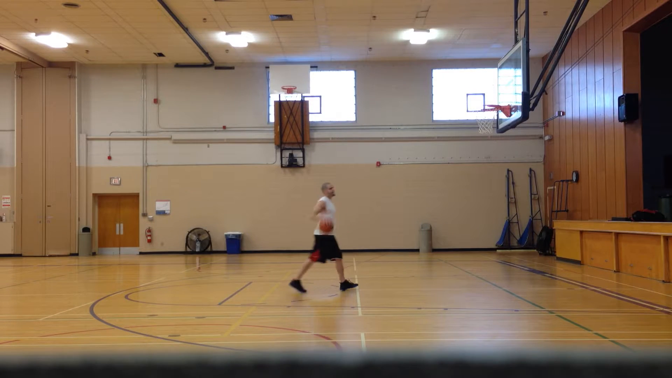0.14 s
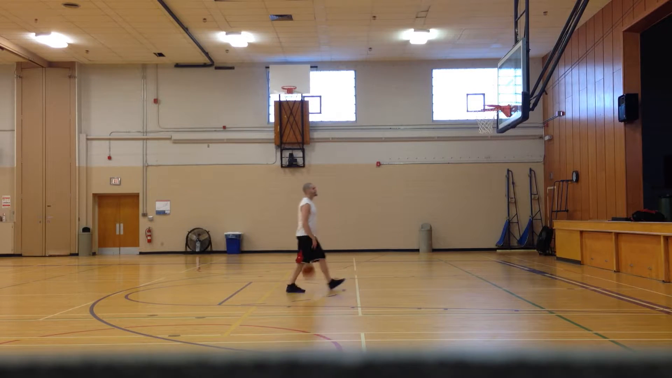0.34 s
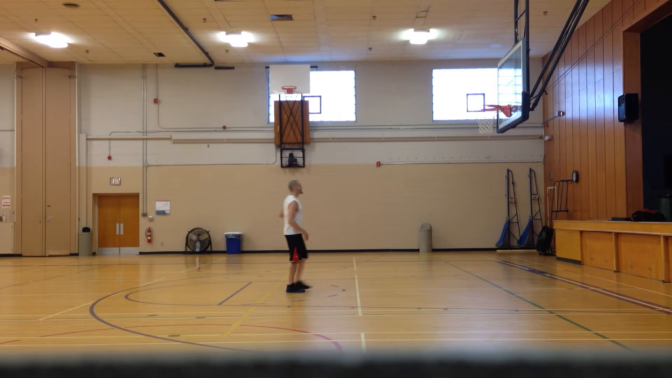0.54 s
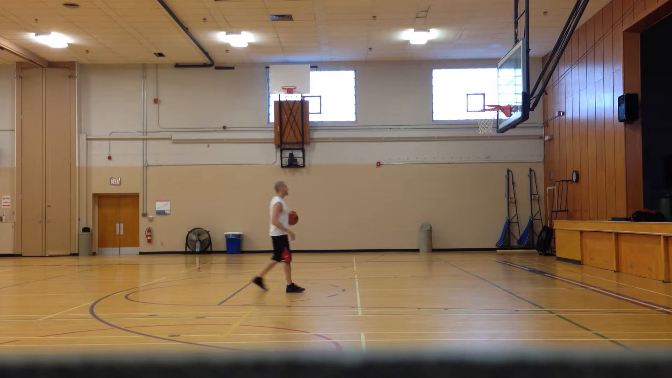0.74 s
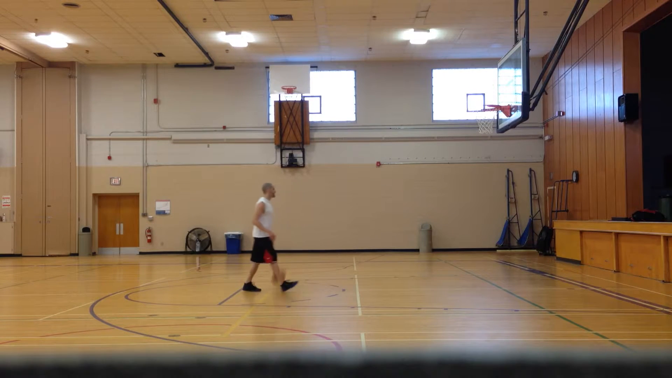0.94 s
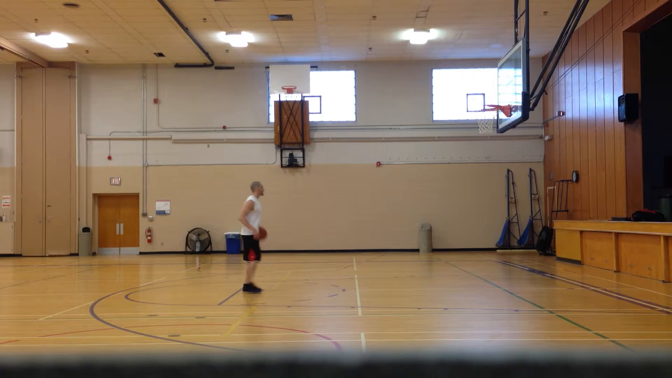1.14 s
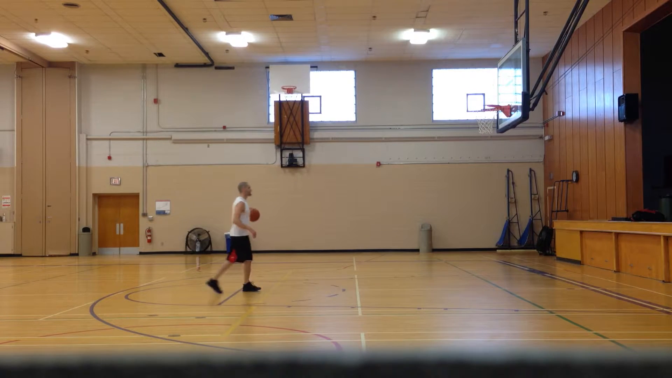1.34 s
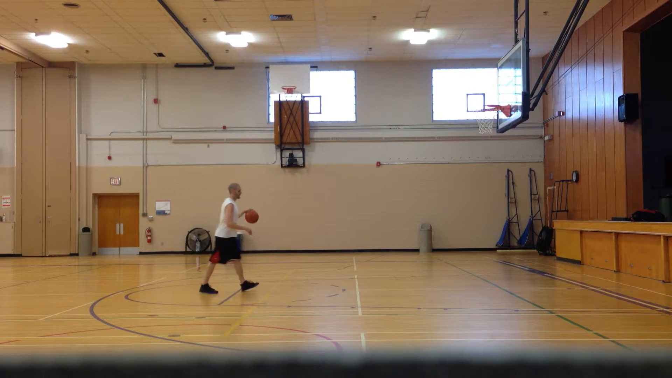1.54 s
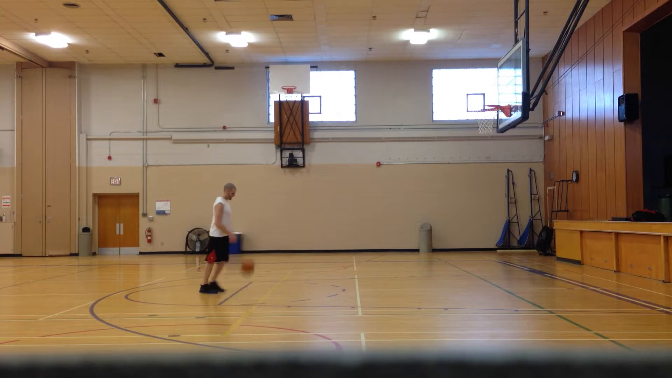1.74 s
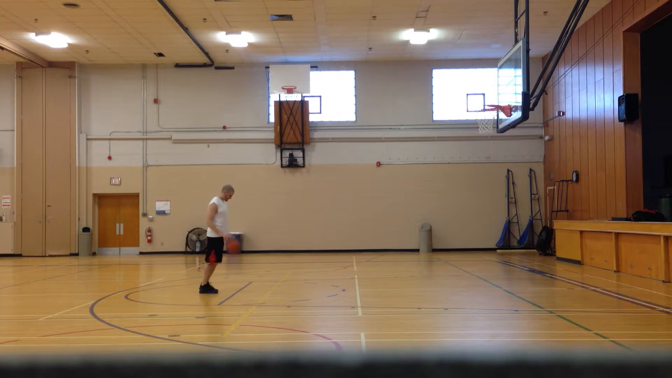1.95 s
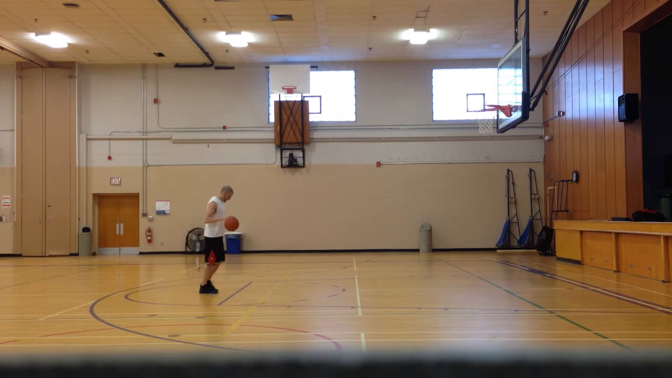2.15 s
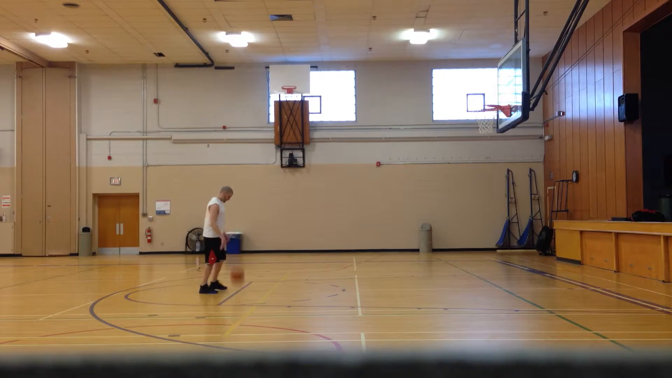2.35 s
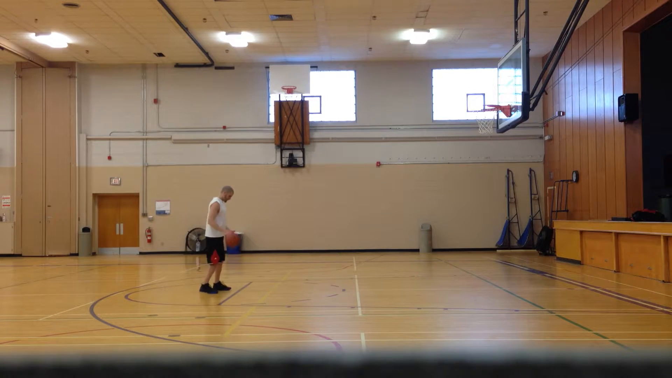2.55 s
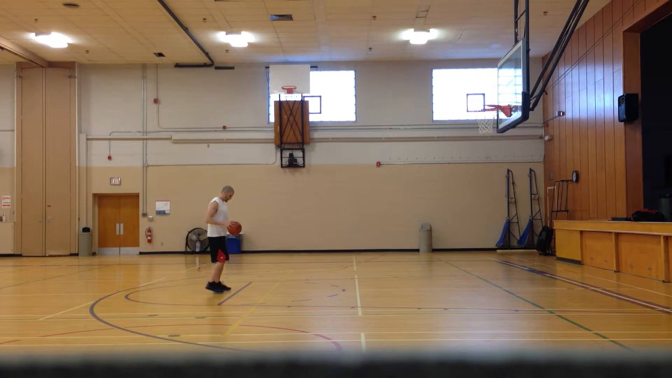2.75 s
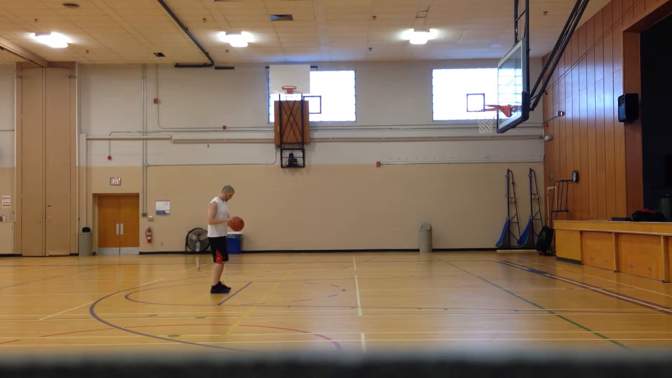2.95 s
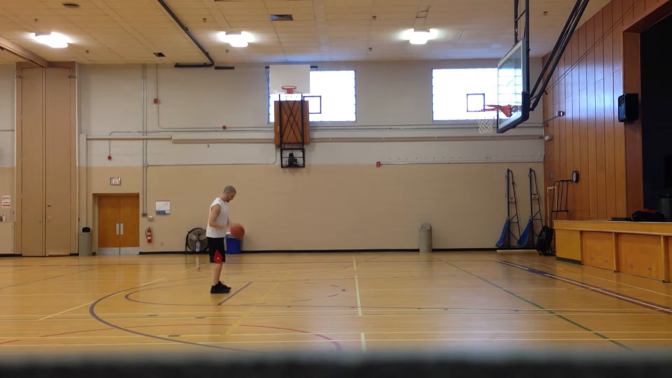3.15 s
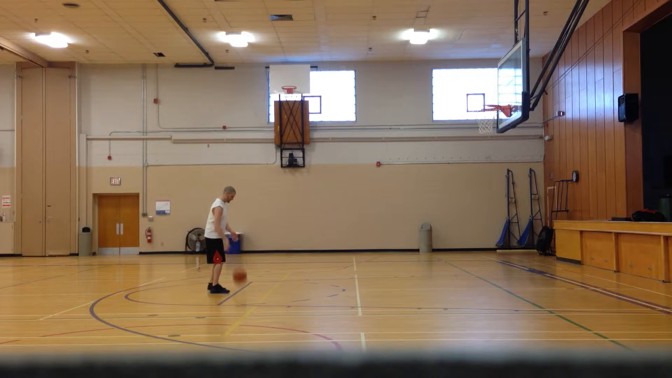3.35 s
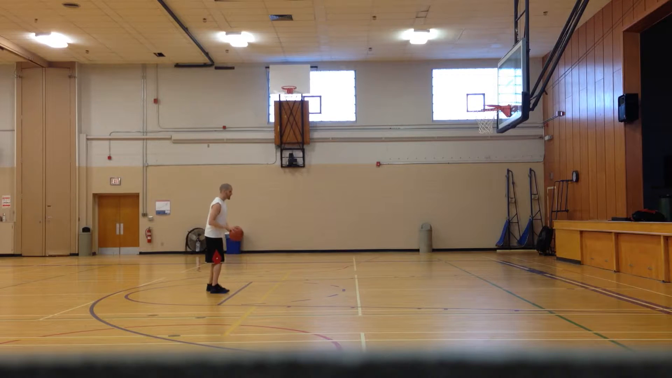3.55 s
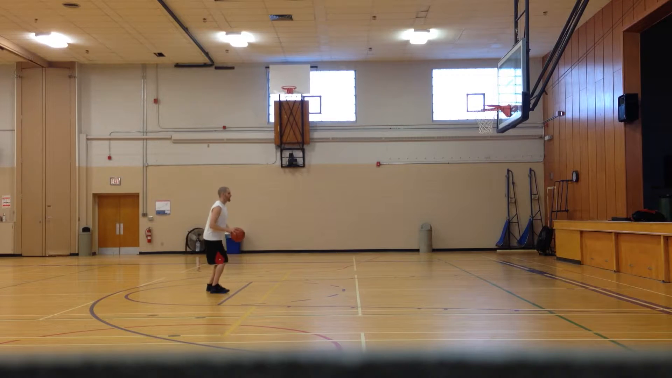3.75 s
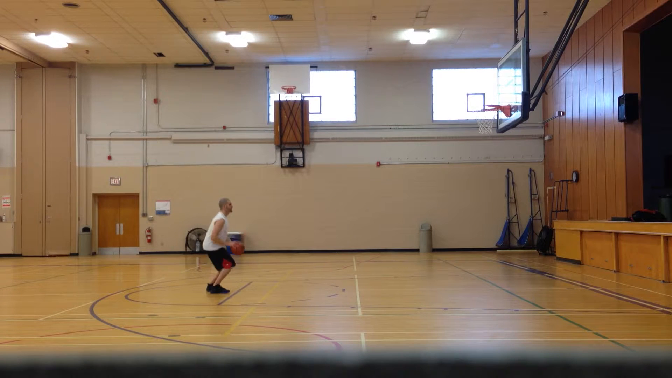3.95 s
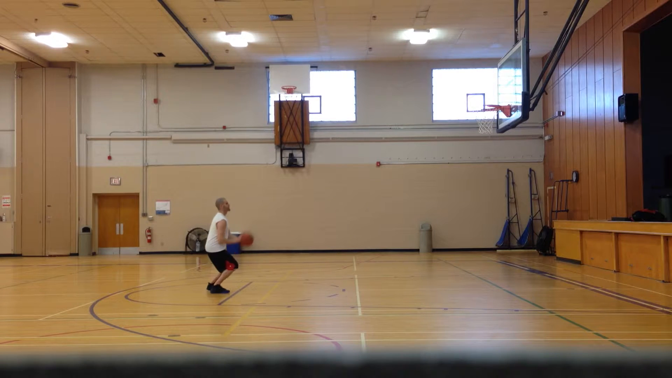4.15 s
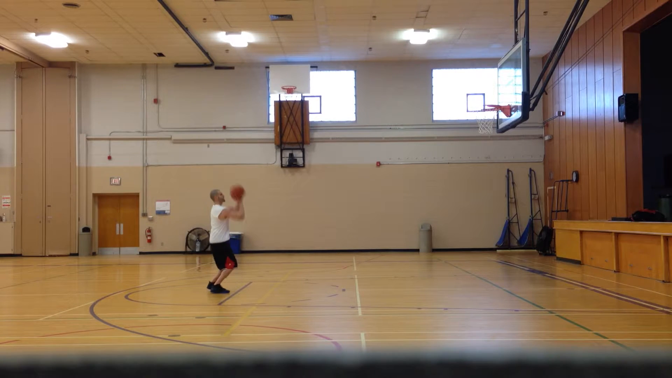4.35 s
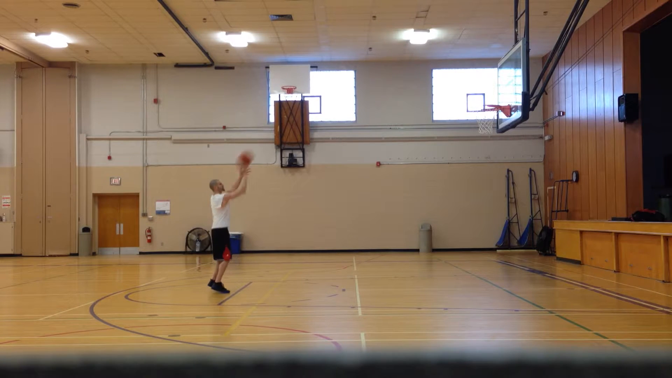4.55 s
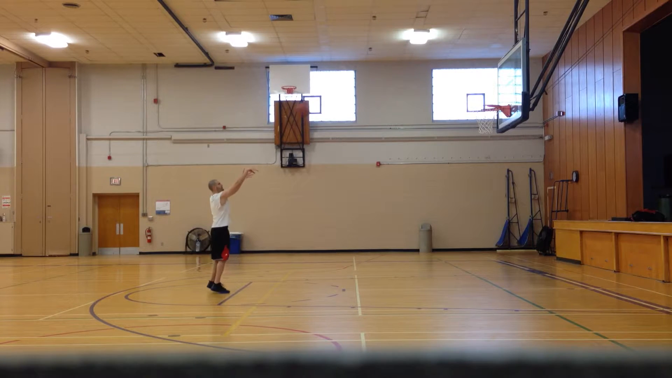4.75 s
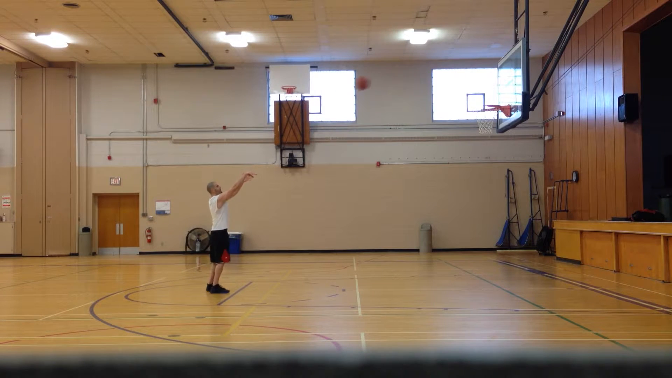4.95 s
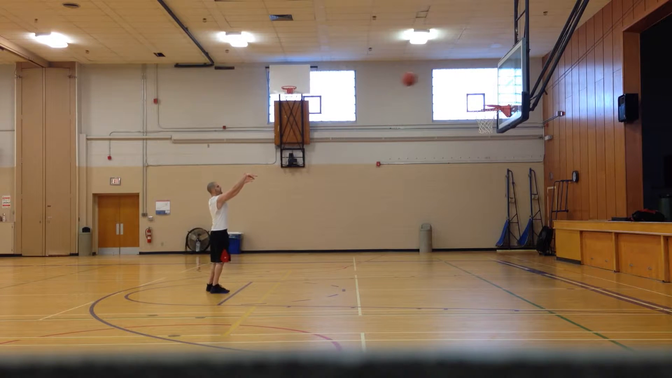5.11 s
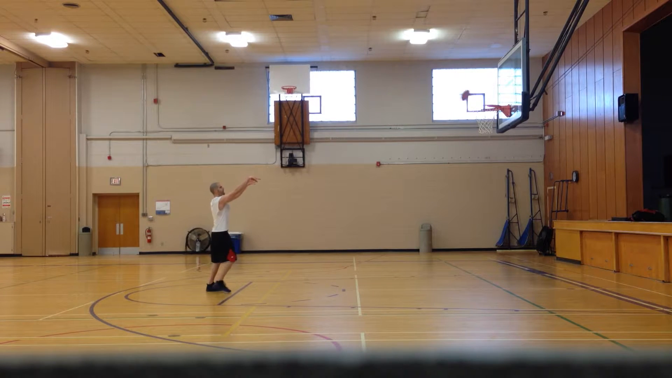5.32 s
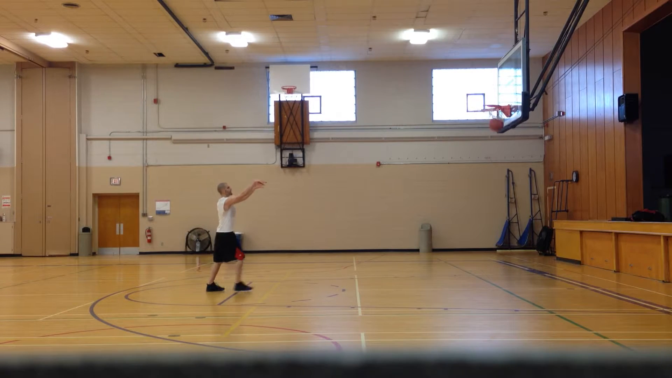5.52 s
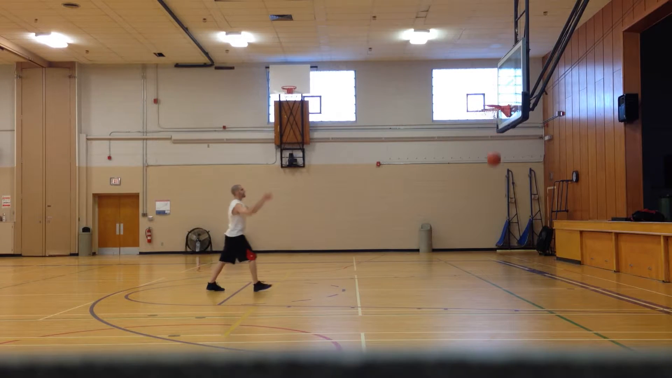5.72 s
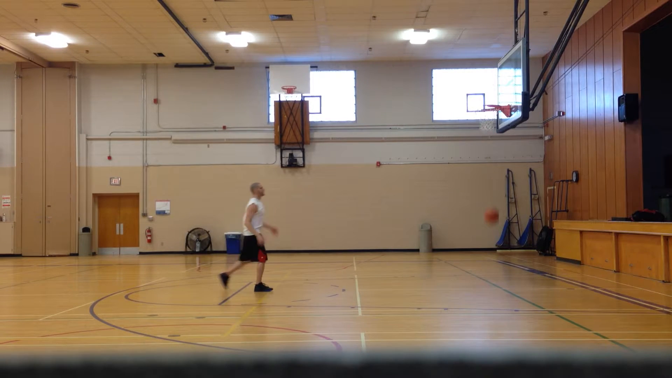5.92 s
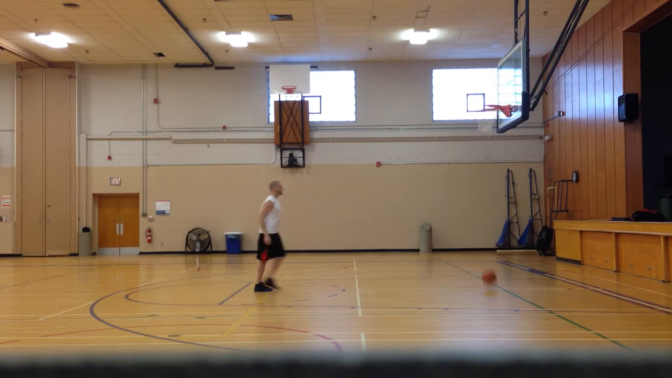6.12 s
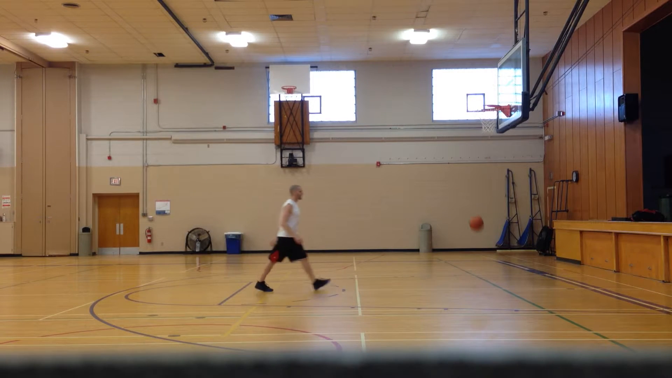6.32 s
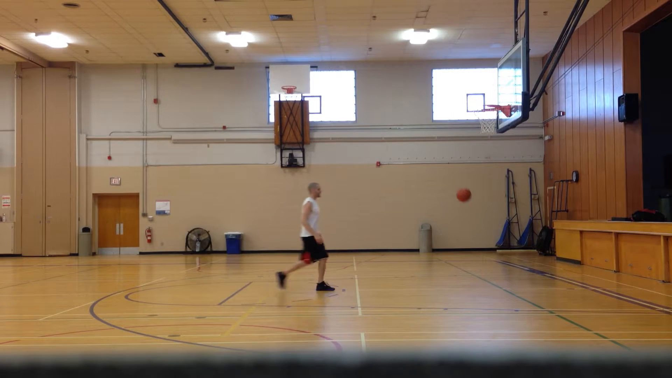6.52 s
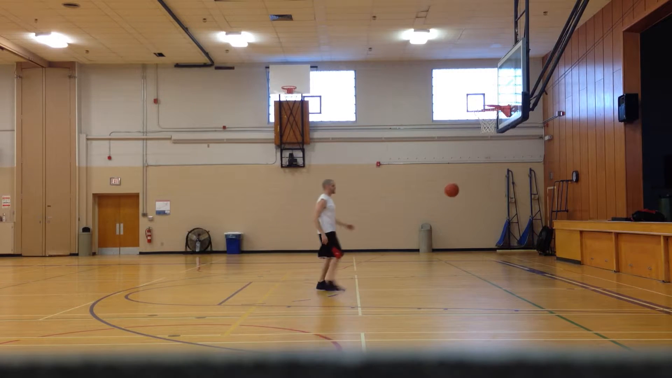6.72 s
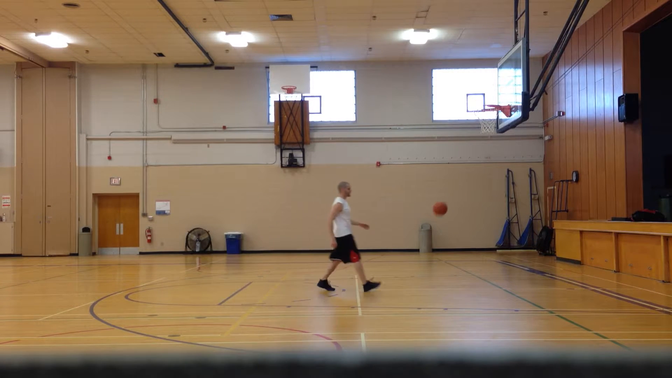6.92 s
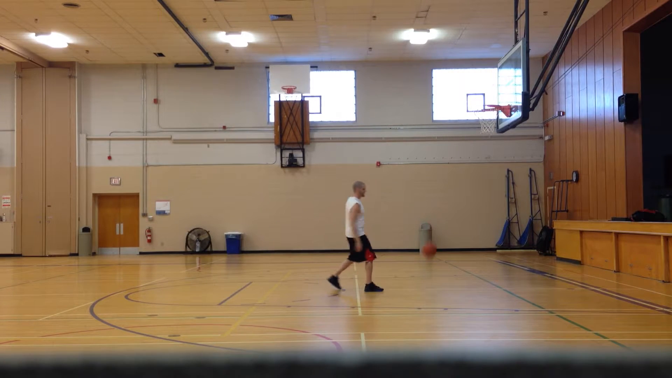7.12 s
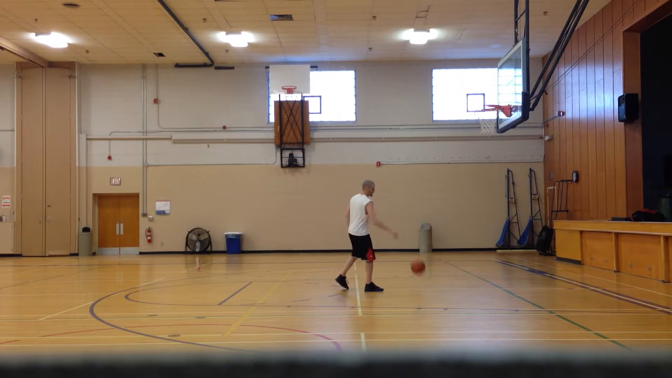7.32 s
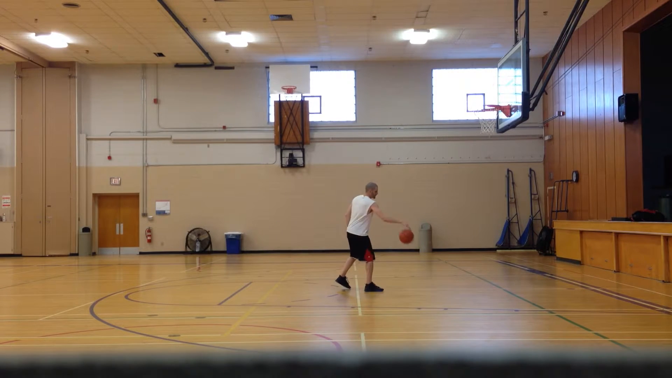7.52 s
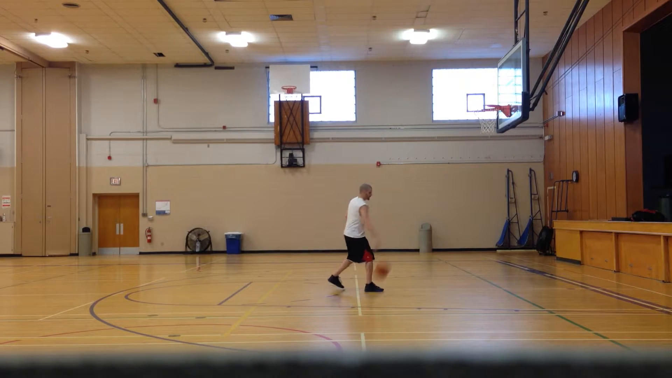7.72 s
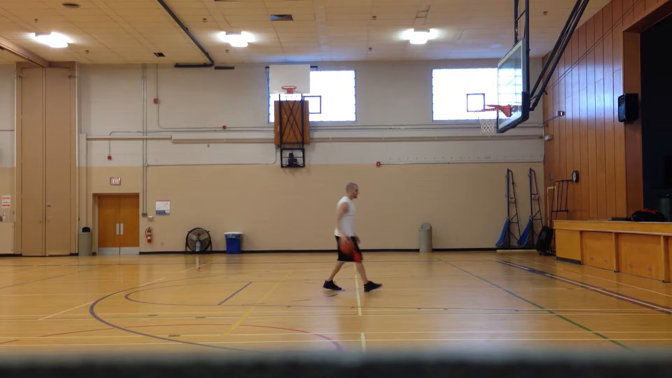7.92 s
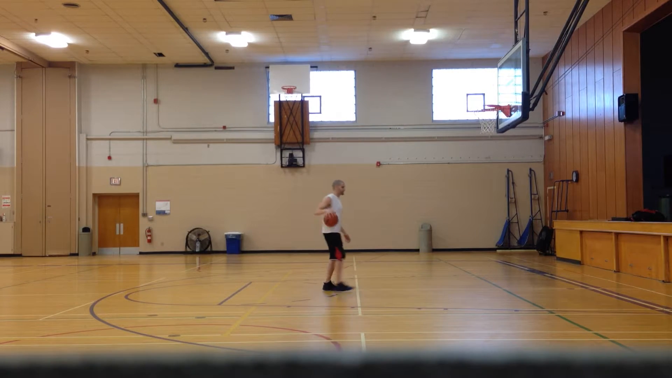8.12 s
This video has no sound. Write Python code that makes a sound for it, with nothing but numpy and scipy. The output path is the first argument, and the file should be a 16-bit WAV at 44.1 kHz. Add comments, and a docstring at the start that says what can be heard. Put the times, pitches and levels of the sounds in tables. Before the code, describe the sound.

In a large gym with a steady ventilation hum, a basketball bounces five times on a springy wooden floor at an easy pace. Each bounce slaps, pings and thumps, with clear echoes and a long tail. After a pause the ball rattles the rim and whips through the net, lands with a louder bounce and bounces twice more. The microphone picks up plenty of the hall.

```python
"""First you hear a bounce dying away in a large gym, over the steady hum of the ventilation.
A basketball is dribbled on the springy wooden floor, shot into the hoop, and dribbled again.
Each bounce is a slap of the skin, a ping of the air in the ball and a thump of the boards;
walls and ceiling throw it back as clear echoes and a long tail.
The shot grazes the hoop, then shakes the rim and whips through the net."""
import sys
import numpy as np
from scipy import signal
from scipy.fft import rfft, irfft, next_fast_len
from scipy.io import wavfile

SR = 44100
rng = np.random.default_rng(int(sys.argv[2]) if len(sys.argv) > 2 else 0)


def to_wav(sig):
    """Store sig (one row per channel, or 1-D mono) as 16-bit WAV at the path in sys.argv[1].

    Samples outside -1..1 are clipped; the rate is SR.
    """
    pcm = np.clip(np.atleast_2d(sig), -1, 1) * 32767
    pcm = np.round(pcm).astype(np.int16)
    wavfile.write(sys.argv[1], SR, pcm.T)  # frames by channels


N = 360297

# Levels in the tables are relative: 0 dB leaves a sound as it is, -6 dB halves its height.
# Each bounce, whose slap is a double click:
# start_s, slap_db, brightness_db_per_octave, click_gap_ms, second_click_share, thump_db, from_stage_m
BOUNCES = [(-.36, -6, 1.7, 0.043, 0.14, -2, 4.5), (0.4342, 0, 0, 0.052, 0.41, -1, 4.6),
           (1.0985, -1.5, -0.22, 0.3, 0.072, -0.5, 7.5), (1.9316, -0.5, -0.3, 0.7, 0.16, -.5, 11),
           (2.5107, -2, 0.52, .7, 0.13, 0.5, 7.3), (3.447, 0.5, -0.2, 0.13, 0.33, -0.5, 6),
           (6.23, 2, -0.5, 0.18, 0.45, 0.5, 1.45), (7.3737, -3, -0.65, 0.088, 0.3, -3, 4.4),
           (7.897, -5, 1, 0.51, 0.25, 0.5, 4.7)]
# The ball's skin slapping the floor: pitch_hz, level_db
SLAP_SPECTRUM = [(60, 24), (300, 13), (700, 1.5), (1300, 12.5), (2200, 8), (4000, 3.5), (5500, -4.5),
                 (10000, -13.5), (15500, -28)]
# Tones of the air inside the ball: pitch_hz, level_db
BALL_TONES = [(600, -52.5), (895, -38.5), (1085, -35.5), (1205, -88), (1420, -40), (1580, -36.5),
              (1770, -68), (2130, -38.5), (2300, -48), (2590, -44), (2860, -37), (3230, -36.5), (3640, -67),
              (4130, -49)]
# Tones of the floorboards (a fade is the time to drop 60 dB): pitch_hz, level_db, fade_s
BOARD_TONES = [(88.8, -34, 0.44), (134, -14, 0.044), (166.5, -27, 0.065), (272.7, -33.5, 0.058),
               (354.3, -32.5, 0.07), (515, -44.5, 0.14)]
# Echoes off nearby surfaces, each a clean copy and a scattered blur: delay_s, copy_db, blur_db, blur_s
FLOOR_ECHOES = [(.0032, -12.5, 8, 0.0032), (.0142, -8.5, 11, 0.005), (.0295, -29, 6.5, .0099),
                (.046, -35, 2.5, 0.0063)]
# The hall's long tail of sound: pitch_hz, level_db
TAIL_SPECTRUM = [(25, -26.5), (50, -23), (85, -27.5), (135, -42), (250, -30.5), (450, -35), (750, -31),
                 (1200, -37), (2200, -36.5), (4000, -38), (5500, -43.5), (8000, -45.5), (15000, -38.5)]
# How long that tail lasts: pitch_hz, fade_s
TAIL_FADES = [(50, 3.15), (90, 2.18), (170, 1.53), (350, 1.75), (700, 1.78), (1200, 2.415), (2400, 2.4),
              (4000, 1.97), (6000, 1.65), (9000, 0.87), (15000, 0.18)]
# Rushing air of the ventilation: pitch_hz, level_db
AIR_SPECTRUM = [(13, -49), (22, -10), (54, -16), (70, -5), (92, -1), (138, -14), (182, -25.5), (209, -20.5),
                (382, -28.5), (414, -26.5), (779, -38), (2600, -45), (2830, -45), (9460, -48.5),
                (15500, -49)]
# Fan and duct tones: pitch_hz, level_db, width_hz
FAN_TONES = [(84.3, -55.5, 17), (110.7, -57, 28), (187.5, -66, 5.3), (382, -77.5, 2.1)]
# The ball touching the hoop: start_s, level_db, width_octaves
HOOP_TOUCHES = [(5.563, -20, 1.8), (5.5758, -2.5, 4.8)]
# Tones of the rim and its bracket: pitch_hz, level_db, fade_s
RIM_TONES = [(335, -35, 0.092), (395, -32.5, 0.1), (445, -32.5, 0.17), (466, -28, 0.2), (483.5, -27, 0.19),
             (606, -60, 0.13), (970, -32.5, 0.055), (1190, -45.5, 0.47), (1455, -51, 0.38),
             (1840, -58, 0.22), (2320, -44, 0.11), (2553, -43.5, 0.19)]
# The rattling mount and the cords of the net: pitch_hz, level_db
NET_SPECTRUM = [(150, -37), (260, -46), (340, -3.5), (480, -14), (620, -27), (1200, -21), (2500, -26),
                (4200, -28.5), (7000, -37), (10000, -44.5), (14000, -38), (16000, -51)]
# The room's echoes of sounds at the hoop: delay_s, copy_db, blur_db, blur_s
HOOP_ECHOES = [(.009, -2.5, 10, 0.014), (0.064, -12, 7.5, 0.017), (0.173, -15, 4, 0.1)]


def amp(db):
    """Turn decibels into a number to multiply by."""
    return 10 ** (np.asarray(db) / 20)


def along(points, hz):
    """Read between the rows of a table by pitch."""
    pitches, values = np.transpose(points)
    return np.interp(np.log(hz + 1), np.log(pitches + 1), values)


def clock(seconds):
    """Sample times of a short sound."""
    return np.arange(int(seconds * SR)) / SR


def filtered(sound, gain):
    """Turn each pitch up or down by gain(hz)."""
    size = next_fast_len(len(sound) + 8192)
    return irfft(rfft(sound, size) * gain(np.fft.rfftfreq(size, 1 / SR)), size)[:len(sound)]


def steady_noise(gain):
    """Noise shaped by gain(hz), with an average power of 1."""
    noise = filtered(rng.standard_normal(N), gain)
    return noise / np.sqrt(np.mean(noise ** 2) + 1e-20)


def pulse(db_at, size=4096):
    """The shortest click with the levels db_at(hz)."""
    cepstrum = irfft(np.log(amp(db_at(np.fft.rfftfreq(size, 1 / SR)))))
    cepstrum[1:size // 2] *= 2  # folding onto the first half packs the energy at the start
    cepstrum[size // 2 + 1:] = 0
    return irfft(np.exp(rfft(cepstrum)))


def ring(tones, t, vary_db, detune):
    """A struck object's fading tones, a little different with every blow."""
    chance = rng.standard_normal((len(tones), 2))
    sound = np.zeros(len(t))
    for (hz, db, fade_s), (louder, higher) in zip(tones, chance):
        level = amp(db + vary_db * louder - 60 * t / fade_s)
        sound += level * np.sin(2 * np.pi * hz * (1 + detune * higher) * t)
    return sound


def add(track, start_s, sound):
    """Mix a sound into the track."""
    start = round(start_s * SR)
    part = sound[max(-start, 0):len(track) - start]
    track[max(start, 0):][:len(part)] += part


def dribble(hall_db=-2.63):
    """Each bounce slaps the floor, pings the air in the ball and thumps the boards."""
    track, t = np.zeros(N), clock(.7)
    for start_s, slap_db, brightness, gap_ms, share, thump_db, metres in BOUNCES:
        suck = amp(slap_db) * squash()
        add(track, start_s - len(suck) / SR, suck)
        blow = amp(slap_db) * slap(t, brightness, gap_ms, share)
        add(blow, 0, amp(thump_db) * ring(BOARD_TONES, t, vary_db=1.5, detune=0.049))
        echoes = [*FLOOR_ECHOES, stage_echo(metres), *wall_flutter(metres)]
        add(track, start_s, gym(blow, echoes, hall_db))
        add(track, start_s, amp(thump_db) * boom(t))
    return track


def squash(level_db=-21, rise_s=0.003):
    """Just before the slap, the ball flattens and draws a swelling suck of air."""
    return -amp(level_db) * np.exp(-clock(.03)[::-1] / rise_s)


def slap(t, brightness, gap_ms, share, pivot_hz=700, fade_s=.045):
    """The skin lands in a double click; the air inside pings until the rubber damps it."""
    ball = ring([(hz, db, fade_s) for hz, db in BALL_TONES], t, vary_db=1, detune=.015)
    add(ball, 0, -pulse(lambda hz: along(SLAP_SPECTRUM, hz)))
    depth = 2 * share / (1 + share ** 2)

    def colour_db(hz):
        # two close clicks partly cancel at some pitches, which sounds hollow
        hollow_db = 10 * np.log10(1 + depth * np.cos(2 * np.pi * hz * gap_ms / 1000))
        return hollow_db + brightness * np.log2(1 + hz / pivot_hz)

    return np.convolve(ball, pulse(colour_db, size=512))


def gym(sound, echoes, hall_db, build_s=0.13, drift_s=.0004):
    """The sound arrives directly, then as echoes, then as a tail that slowly fills the hall."""
    t = clock(1.7)
    hz, frame_s, noise = signal.stft(rng.standard_normal(len(t)), SR, nperseg=512)
    tail_db = along(TAIL_SPECTRUM, hz)[:, None] - 60 * frame_s / along(TAIL_FADES, hz)[:, None]
    tail = signal.istft(noise * amp(tail_db), SR, nperseg=512)[1][:len(t)]
    tail_power = amp(hall_db) ** 2 * (1 - np.exp(-(t / build_s) ** 2))
    paths = np.zeros(len(t))
    paths[0] = 1  # the direct sound
    for delay_s, copy_db, blur_db, blur_s in echoes:
        late_s = abs(delay_s + drift_s * rng.standard_normal())  # paths change as the ball moves
        paths[round(late_s * SR)] += amp(copy_db)
        tail_power += amp(blur_db) ** 2 * (t > late_s) * np.exp(-abs(t - late_s) / blur_s)
    return signal.fftconvolve(sound, paths + tail * np.sqrt(tail_power))


def stage_echo(metres, sound_m_per_s=343, blur_s=0.0033):
    """The stage front answers later and weaker the farther away the ball is."""
    copy_db = -11 - 10 * np.log10(metres)
    blur_db = copy_db + 9
    return 2 * metres / sound_m_per_s, copy_db, blur_db, blur_s


def wall_flutter(metres, trip_s=.0764, blur_s=0.016):
    """Sound bounces between facing walls, weaker and more smeared each trip, clearest by the stage."""
    distance_db = 0.28 * (metres - 5)
    echoes = []
    for k in range(3):
        copy_db = -16.5 - 6 * k - distance_db
        blur_db = 5.5 - 5 * k - distance_db
        echoes.append(((k + 1) * trip_s, copy_db, blur_db, (k + 1) * blur_s))
    return echoes


def boom(t, centre_hz=86, every_s=0.0907, width_s=0.012, peak_s=0.163, fall_db_per_s=64.5):
    """The thump rolls through the hall as six almost evenly spaced bass swells."""
    sound = np.zeros(len(t))
    for k, (louder, higher, later, phase) in enumerate(rng.standard_normal((6, 4))):
        delay_s = (k + 1) * every_s + .005 * later
        level = amp(-21.5 - fall_db_per_s * abs(delay_s - peak_s) + 2 * louder)
        swell = np.exp(-.5 * ((t - delay_s) / width_s) ** 2)
        pitch_hz = centre_hz * (1 + 0.0905 * higher)
        sound += level * swell * np.sin(2 * np.pi * (pitch_hz * t + phase))
    return sound


def ventilation(rush_db=-48.5):
    """A steady rush of air with wavering fan and duct tones."""
    rush = steady_noise(lambda hz: amp(along(AIR_SPECTRUM, hz)))
    hum = sum(amp(db) * steady_noise(lambda hz: 1 / (1 + (2 * (hz - pitch_hz) / width_hz) ** 2))
              for pitch_hz, db, width_hz in FAN_TONES)
    return amp(rush_db) * rush + hum


def hoop(centre_hz=2500, lowest_hz=300):
    """A soft graze, then a hit, shakes the rim and the net; neither gives off bass."""
    track, t = np.zeros(N), clock(.5)
    for start_s, db, octaves in HOOP_TOUCHES:
        blow = net_rattle()
        rim = ring(RIM_TONES, t, vary_db=3.5, detune=0.0013)
        add(blow, 0, gym(rim, HOOP_ECHOES, hall_db=0))
        # a glancing touch stirs only the middle pitches
        touch = filtered(blow, lambda hz: np.exp(-(np.log2((hz + 1) / centre_hz) / octaves) ** 2))
        add(track, start_s, amp(db) * touch)
    return signal.sosfilt(signal.butter(4, lowest_hz, "high", fs=SR, output="sos"), track)


def net_rattle(fade_s=0.16, slices=16):
    """A short fading rustle of net and mount, with a smooth, hissing hall tail."""
    track, step = np.zeros(2 * SR), SR // 110
    window = np.sin(np.pi * np.arange(2 * step) / (2 * step))
    # each slice of the noise gets its own tail, so the sum does not ring like a chime
    for start in range(-step, (slices - 1) * step, step):
        t = (start + np.arange(2 * step)) / SR
        noise = filtered(rng.standard_normal(len(t)), lambda hz: amp(along(NET_SPECTRUM, hz)))
        fade = (t > 0) * amp(-60 * t / fade_s)
        add(track, start / SR, gym(noise * window * fade, HOOP_ECHOES, hall_db=3.5))
    return track


def scene():
    """Ball, hoop and ventilation, mixed into one channel."""
    return (dribble() + hoop() + ventilation())[None]


def record(dry, low_hz=38, top_hz=15500):
    """Trim away the deepest bass and the highest treble."""
    trimmed = signal.sosfilt(signal.butter(3, low_hz, "high", fs=SR, output="sos"), dry[0])
    return filtered(trimmed, lambda hz: hz < top_hz)[None]


dry = scene()
out = record(dry)
to_wav(out)
```